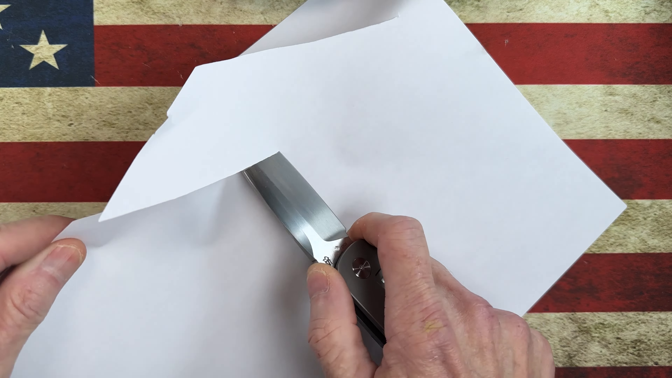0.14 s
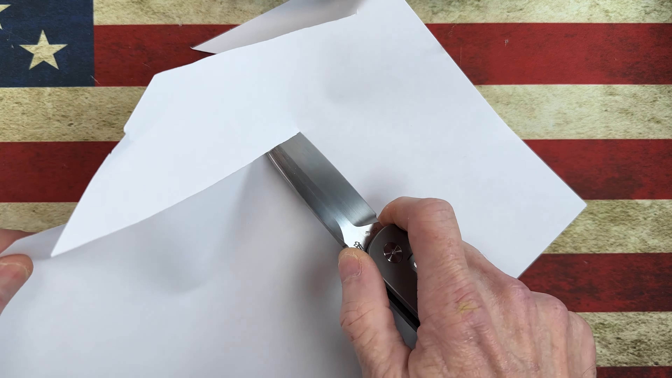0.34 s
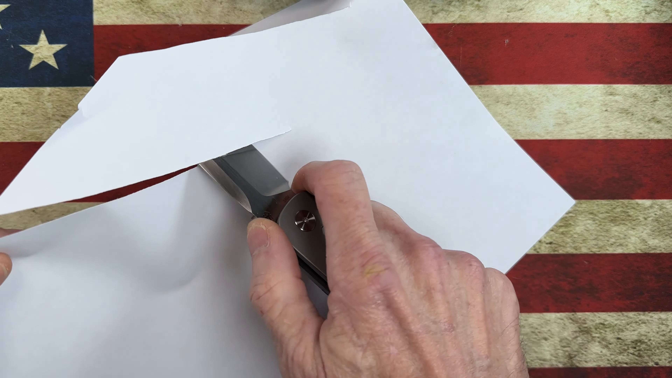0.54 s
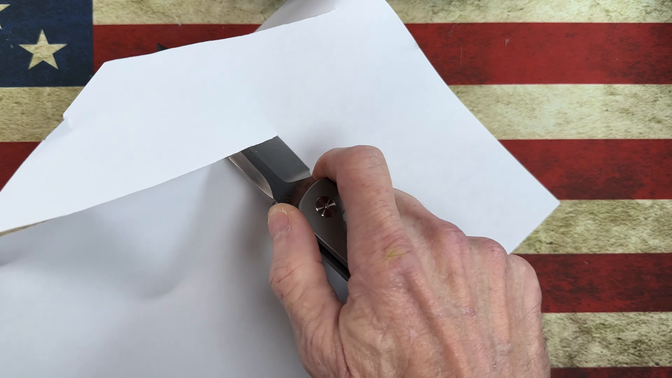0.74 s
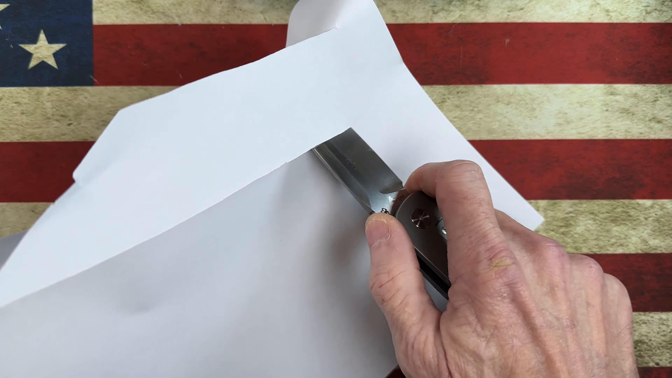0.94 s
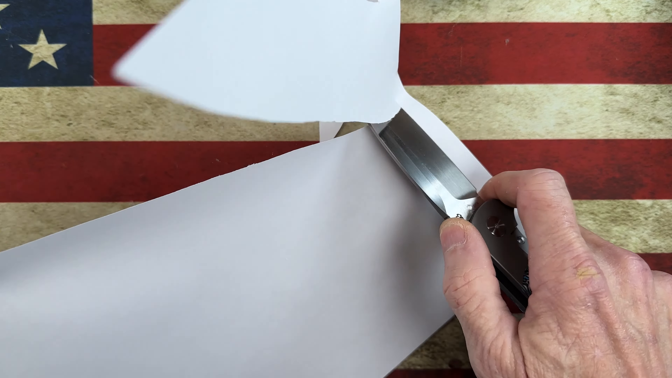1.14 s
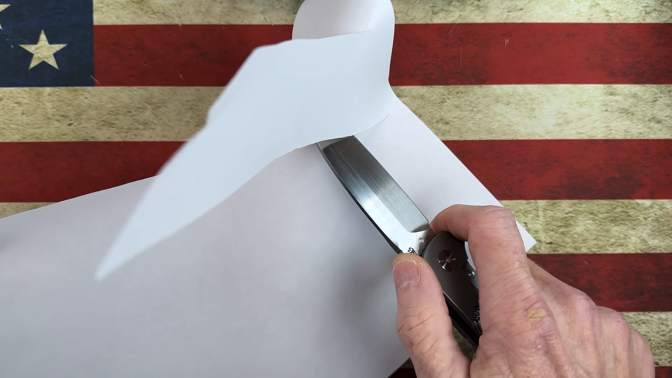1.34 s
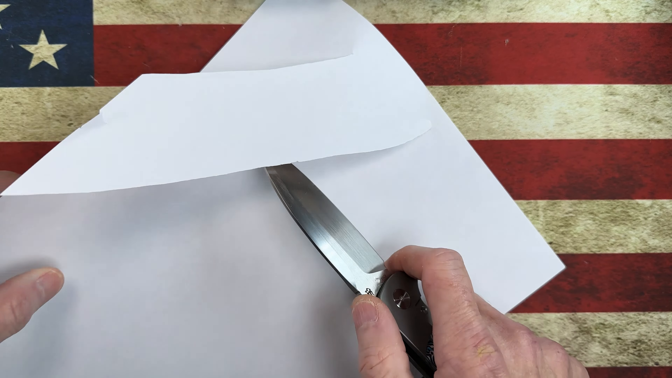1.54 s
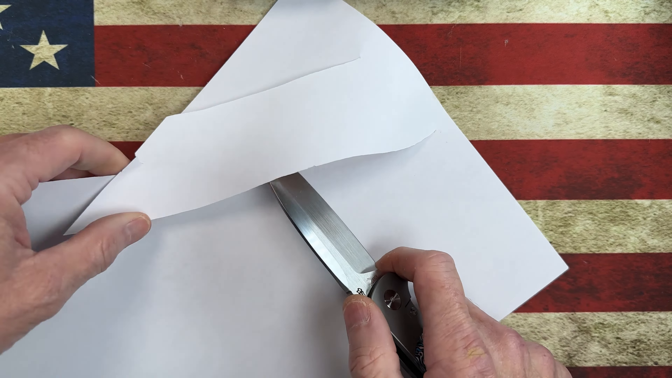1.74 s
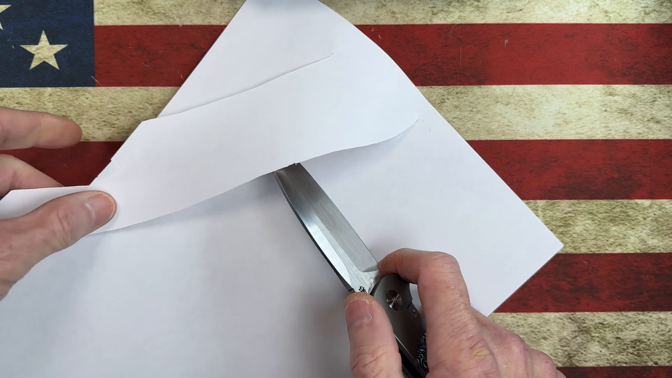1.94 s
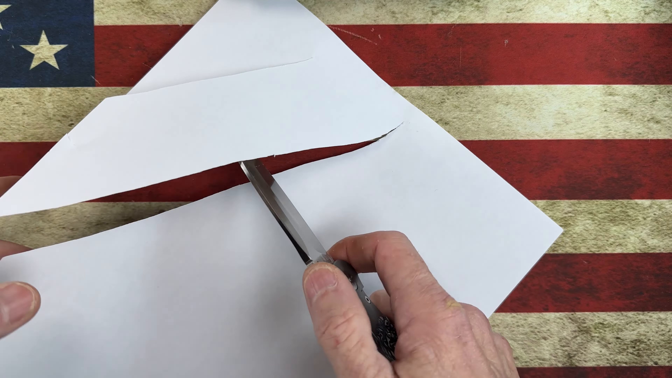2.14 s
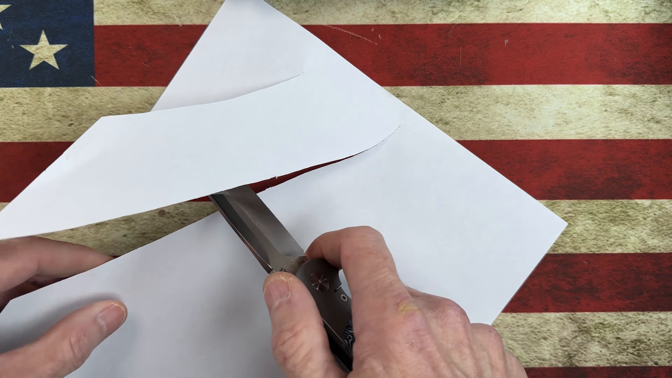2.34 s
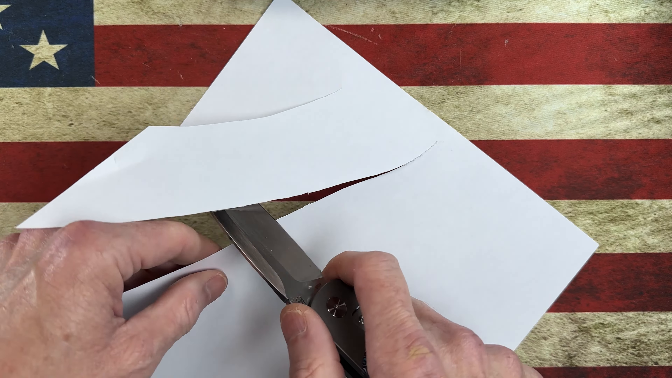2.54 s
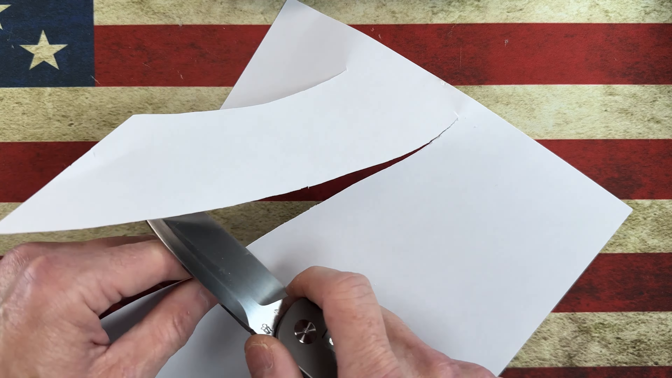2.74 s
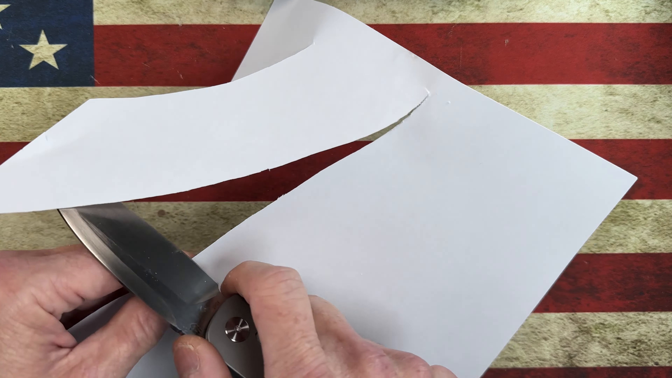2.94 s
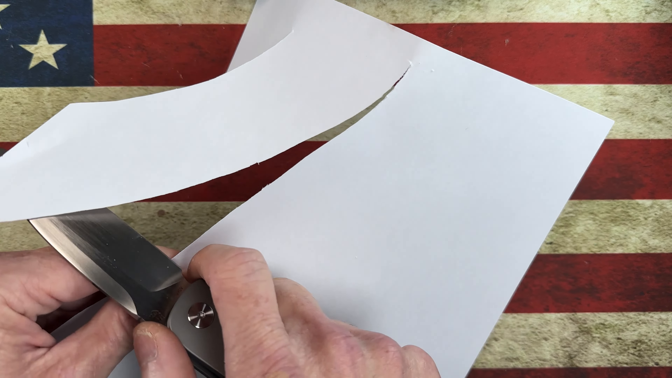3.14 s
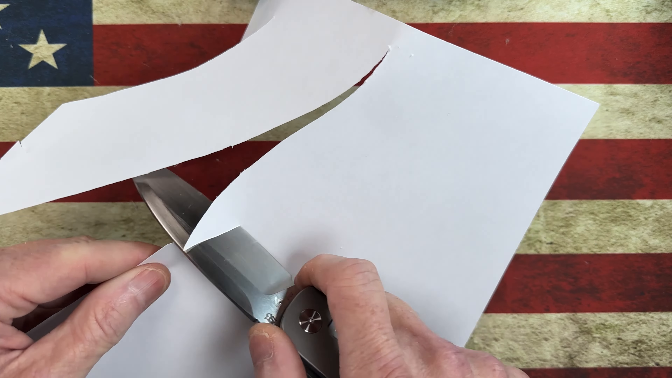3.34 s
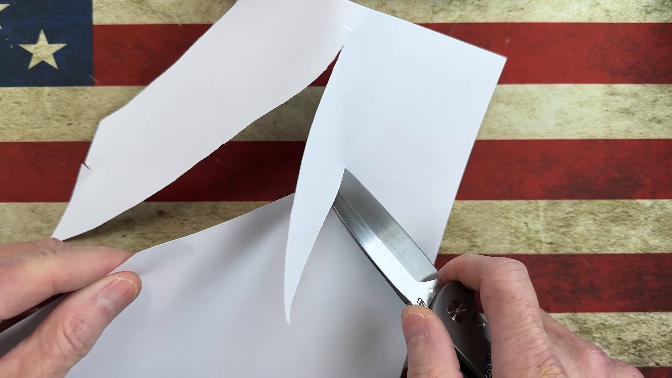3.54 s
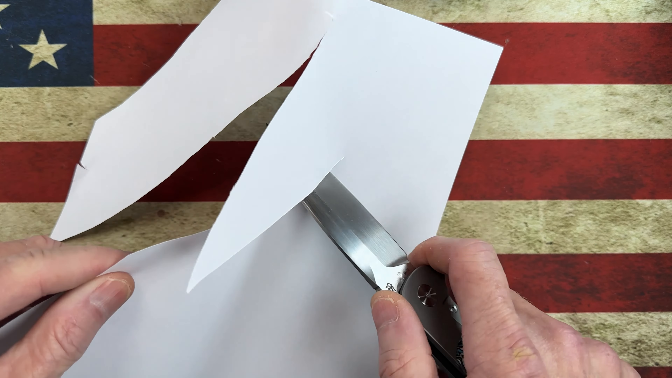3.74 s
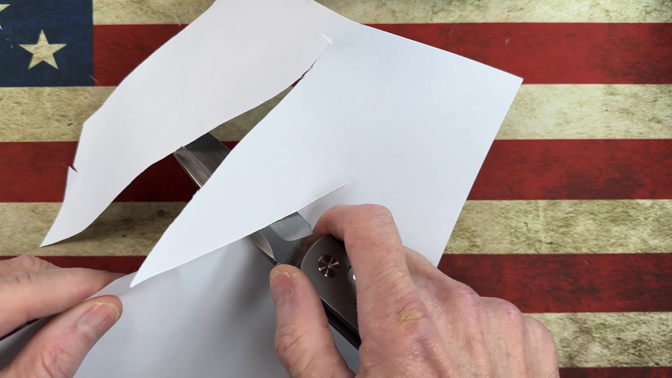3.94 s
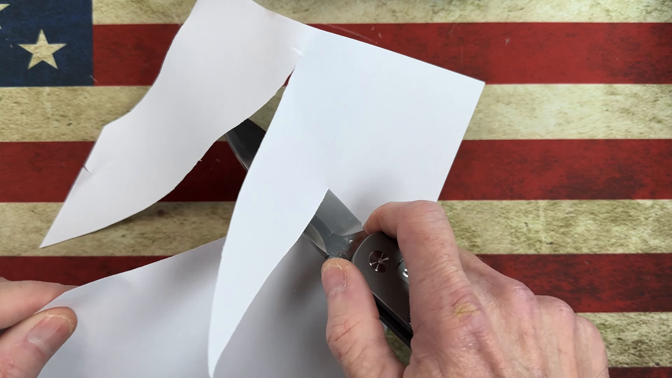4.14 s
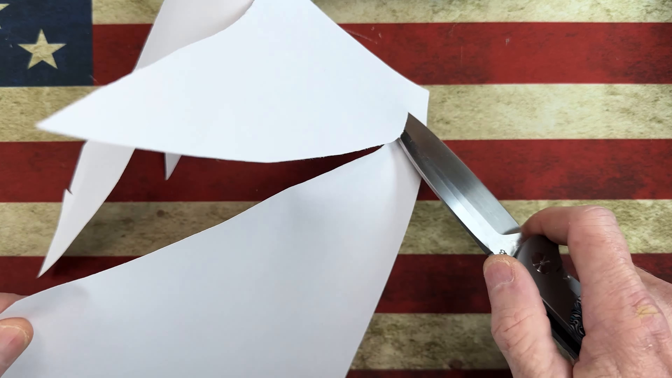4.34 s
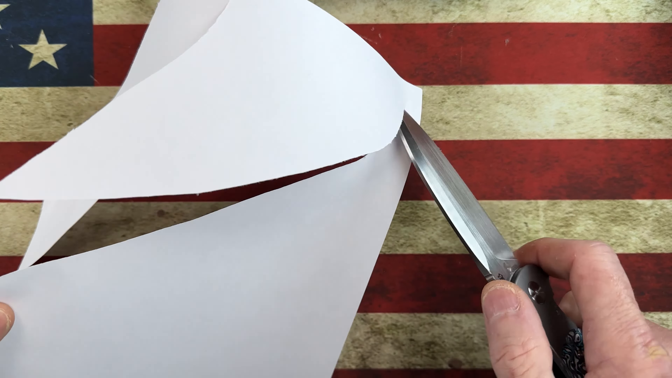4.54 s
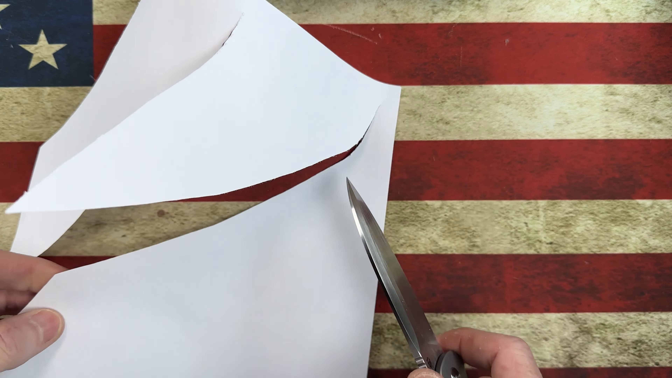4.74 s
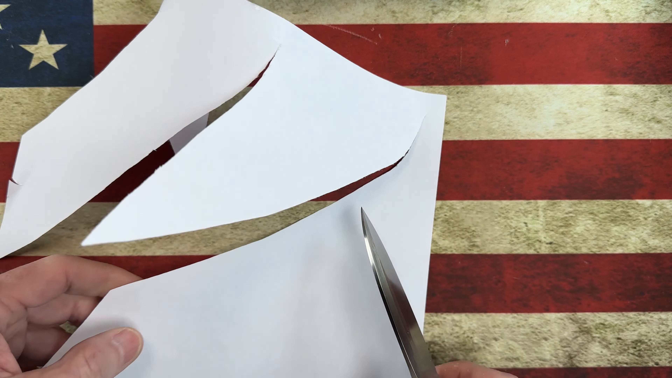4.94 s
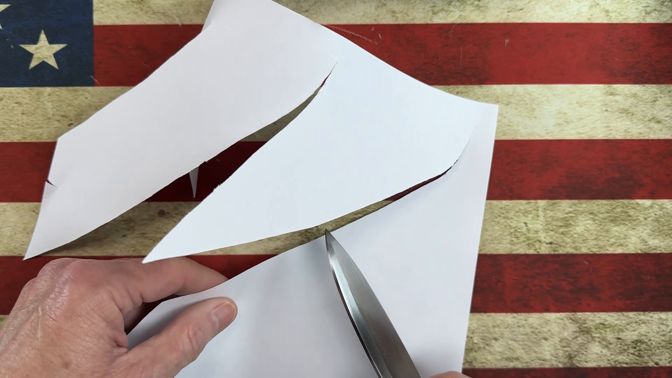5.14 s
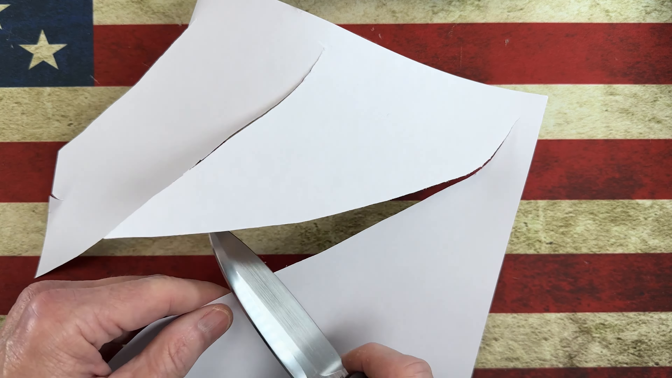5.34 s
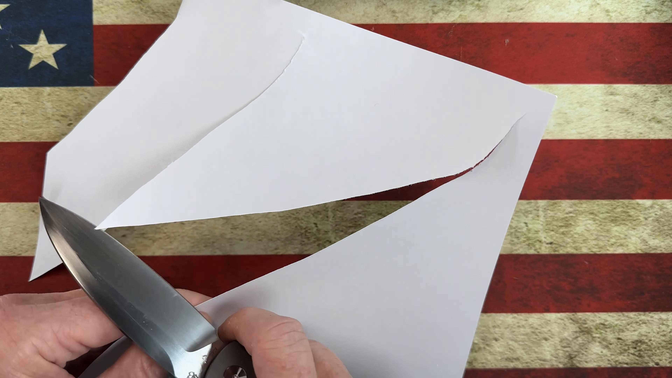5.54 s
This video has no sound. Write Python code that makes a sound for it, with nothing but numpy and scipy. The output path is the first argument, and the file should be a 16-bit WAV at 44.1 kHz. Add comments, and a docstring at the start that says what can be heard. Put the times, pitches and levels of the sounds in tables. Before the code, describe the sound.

Four brief tearing hisses of a knife through paper, each about a third of a second: two in the first second, two after three seconds. Between them the blade rubs back softly, loose strips rustle and tick, and the sheet pops once. Recorded close and dry in a small room, mono, with barely audible air and mains hum.

```python
"""A small room: over a table, a sharp knife slices a hand-held sheet of paper in four strokes, close to one microphone.
The edge snaps thousands of fibres a second; the sheet radiates them through resonances that fade, drift and pass.
Between strokes the blade slides back, loose strips rustle and tick, and the bending sheet pops once.
Noise bursts make the ticks, damped sines and a noise flutter the pop, wavering sines and noise the hum and air.
Dense, decaying noise serves as the reflections from table and walls."""
import sys
import numpy as np
from scipy import signal
from scipy.fft import rfft, irfft, next_fast_len
from scipy.io import wavfile
from scipy.ndimage import uniform_filter1d

SR = 44100
rng = np.random.default_rng(int(sys.argv[2]) if len(sys.argv) > 2 else 0)


def log_audio(samples):
    """Write samples as a 16-bit WAV file to the path given in sys.argv[1]."""
    # one column per channel
    frames = np.atleast_2d(samples).T
    # limit to full scale, then quantise
    limited = np.clip(frames, -1, 1)
    pcm = np.round(limited * 32767).astype(np.int16)
    wavfile.write(sys.argv[1], SR, pcm)


N = 246078
TIME = np.arange(N) / SR

# Body and fizz lie below and above these crossovers, with the middle band between them.
BODY_HZ, FIZZ_HZ = 1100, 4500
# Colour tables shape each band from within; the bands are then levelled separately.
# In cuts, slides and rustles, level_db is the middle band before the trim in scene(),
# and body and fizz are relative to the middle.

# Mains hum: pitch_hz, level_db (rms)
HUM_TONES = [(59.2, -71.5), (120, -70), (203, -70.5), (295, -78)]
# Colour of the still room air: pitch_hz, level_db (relative)
AIR_COLOUR = [(20, -0.5), (32, -26), (48, -6), (87, -2), (125, -12.5), (148, -9.5), (200, -8.5), (235, -11),
              (300, -12), (420, -16), (760, -19), (1100, -26.5), (5000, -40.5), (10000, -44.5),
              (16000, -56)]
AIR_DB = -64.5  # rms

# Knife strokes, from swell to crest to sag to release: start_s, length_s, attack_s, level_db (at the crest),
# swell_db, crest (share of length), sag_db, release_s (per 60 dB),
# first_body_db, last_body_db, first_fizz_db, last_fizz_db
CUT_STROKES = [(0.0, 0.28, 0.00067, -32, 3.5, 0.28, 6.5, 0.0643, -18, -4.5, -8, -5),
               (0.798, 0.27, 0.006, -41, 4.5, 0.53, 3.3, 0.25, -6.5, -8.5, -7, 0.5),
               (3.251, 0.37, 0.005, -36, 18.5, 0.71, 5, 0.11, -13, -7.5, 1, -5.5),
               (4.147, 0.24, 0.002, -40.5, 0, 0.56, 4, 0.23, -1, -3, -4.5, 2.5)]
SWELL_CURVE, SAG_CURVE = 1.9, 1.13  # powers of the distance before and after the crest
EASE_OFF_S = 0.004  # rounds the corner into the release
# Colour of the sheet in each stroke: pitch_hz, level_db (relative)
CUT_COLOUR_1 = [(150.0, -31), (300.0, -17), (450.0, -12), (700.0, -11), (950.0, -10), (1250.0, -12.5),
                (1800.0, -1.5), (2600.0, -9), (3600.0, -10.5), (5000.0, -11.5), (7000.0, -17.5),
                (9000.0, -20), (12000.0, -27.5), (15500.0, -41.5)]
CUT_COLOUR_2 = [(150.0, -24), (300.0, -10), (450.0, -11), (700.0, -3), (950.0, -6), (1250.0, -8),
                (1800.0, 1.5), (2600.0, -2), (3600.0, -3.5), (5000.0, -6.5), (7000.0, -8.5), (9000.0, -10),
                (12000.0, -21.5), (15500.0, -28)]
CUT_COLOUR_3 = [(150.0, -63), (300.0, -11.5), (450.0, -4.5), (700.0, 0.5), (950.0, 0), (1250.0, 2),
                (1800.0, 0.5), (2600.0, 1.5), (3600.0, -0.5), (5000.0, -6.5), (7000.0, -7.5),
                (9000.0, -15.5), (12000.0, -19.5), (15500.0, -32)]
CUT_COLOUR_4 = [(150.0, -21), (300.0, -12), (450.0, -4), (700.0, -1.5), (950.0, -1.5), (1250.0, -4),
                (1800.0, -2.5), (2600.0, -2), (3600.0, -2), (5000.0, -9), (7000.0, -11), (9000.0, -14),
                (12000.0, -20.5), (15500.0, -31)]

# Resonances (+) and nulls (-) of the sheet, deepest as each pass starts: pitch_hz, half_width_hz, level_db
SHEET_RESONANCES = [(895, 52, 5.5), (1050, 104, -3), (1740, 230, 1.5), (2950, 240, 1), (3760, 350, -4.5),
                    (4585, 73, 4), (6300, 250, -1.5), (7050, 190, 2.5)]
SLACKEN_S = 0.55  # time for their depth in dB to fall to 1/e
# The loose flap rings (+) or goes dull (-) for a moment as it bends:
# strongest_s, half_duration_s, pitch_hz, drift_hz_per_s, half_width_hz, level_db
FLAP_RINGS = [(0.1, 0.16, 7100, 1197.5, 260, 3), (0.195, 0.041, 4700, 500, 169.4, 4),
              (0.219, 0.033, 5160, -500, 129, 12.5), (0.15, 0.045, 9960, 0, 1500, -8),
              (0.842, 0.051, 4650, -2300, 220, 12), (2.19, 0.031, 2340, 5000, 318, 12.5),
              (2.47, 0.045, 7600, 0, 220, 11), (3.343, 0.1, 4180, -1000, 210, 12.5),
              (3.32, 0.076, 3000, 800, 170, 8.5), (3.396, 0.027, 750, 0, 400, -7.5),
              (3.465, 0.071, 1620, 500, 230, 8), (3.44, 0.046, 8460, 500, 190, 14),
              (3.543, 0.098, 7960, -200, 270, 7.5), (3.562, 0.049, 2220, -100, 130, 9),
              (4.28, 0.043, 2820, 0, 210, 8)]
# Weaker resonances of the flap come and go at random, drifting up or down by at most the given rate.
PASSING_PER_S, PASSING_DB, PASSING_HALF_S = 60, 7.5, 0.038
PASSING_HALF_WIDTH_HZ, MAX_DRIFT_HZ_PER_S = 110, 770
PASSING_LOW_HZ, PASSING_TOP_HZ = 1850, 13550

# Decay of the room: pitch_hz, t60_s
ROOM_DECAY = [(200, 0.26), (1000, 0.37), (3000, 0.47), (8000, 0.11), (15000, 0.12)]
# Reflections from table and walls are fullest near 1 kHz and duller in the treble: pitch_hz, level_db (relative)
REFLECTION_COLOUR = [(200, 1.5), (1000, 3), (1900, -0.5), (3500, -3.5), (6000, -2), (15000, -4)]

# Ticks and flicks of the paper: start_s, middle_db (before the trim in ticks()), body_db, fizz_db, t60_s
PAPER_TICKS = [(0.2296, -23.5, -55, -44, 0.045), (1.0809, -37, -42.5, -47, 0.029),
               (1.2888, -47, -73, -58, 0.055), (1.4386, -50, -74, -48.5, 0.08),
               (1.4601, -44.5, -61, -59, 0.085), (1.5005, -45, -73, -63, 0.035),
               (2.049, -78, -61.5, -65, 0.087), (2.2523, -61, -55, -59, 0.049),
               (2.6373, -50, -60, -50, 0.038), (4.0107, -55, -61, -62, 0.054),
               (4.149, -32, -34.5, -62, 0.022), (4.4652, -42, -57, -54, 0.038),
               (5.011, -56.5, -60, -56, 0.042), (5.0863, -57, -55, -54, 0.02),
               (5.426, -62, -65, -58, 0.089)]
# Colour of a tick: pitch_hz, level_db (relative)
PAPER_TICK_COLOUR = [(250, -42), (600, 0), (1000, -11.5), (1700, 17), (2400, 14), (3200, -6), (4000, 1),
                     (5500, -17), (9000, -20.5), (15000, -42)]

# Loose strips flex and brush each other: start_s, length_s, level_db (at the top of the arch), body_db, fizz_db
STRIP_RUSTLES = [(0.282, 0.11, -59.5, -3, 6), (0.42, 0.066, -57.5, -23, 0), (0.682, 0.1, -54.5, -11, -3.5),
                 (0.729, 0.15, -60.5, 7, -1.5), (1.069, 0.1, -52, 2, -19), (1.245, 0.063, -59, -6, -1),
                 (1.339, 0.047, -63, 0, -1), (1.415, 0.1, -53.5, -15, -10), (1.61, 0.092, -58, -12, -21),
                 (1.932, 0.068, -65, -24, 0), (2.0, 0.036, -60.5, -1, -3), (2.161, 0.072, -64.5, -8, -16),
                 (2.257, 0.093, -65, 6, -4), (2.386, 0.074, -64, -18, -6), (2.958, 0.036, -74, 0, 0),
                 (3.063, 0.075, -78, -2.5, 1), (3.213, 0.1, -72, 7.5, 5), (3.254, 0.069, -54, 5, 3),
                 (3.618, 0.11, -53.5, -16, -7.5), (4.593, 0.093, -60.5, -1, 1),
                 (4.7, 0.087, -64.5, -18, 0.5), (5.005, 0.14, -60.5, 7, -18), (5.126, 0.18, -62, -3.5, 1),
                 (5.225, 0.1, -70, 9, -4)]
RUSTLE_SKEW = 0.66  # below 1, a rustle rises faster than it fades

# The flat of the blade slides along the paper: start_s, length_s, first_level_db, last_level_db, body_db, fizz_db
BLADE_SLIDES = [(0.301, 0.353, -62, -67, -3.5, -0.5), (1.149, 0.1, -69, -75.5, -4, 1.5),
                (1.252, 0.28, -62.5, -65, -5, -4), (1.531, 0.513, -65.5, -66, -13, -2.5),
                (2.041, 0.67, -78, -64.5, -9.5, -1.5), (2.69, 0.4, -72.5, -86, -4, 0),
                (3.679, 0.6, -65, -66.5, -4, 1), (4.467, 0.377, -65.5, -73.5, -2, 0.5),
                (4.849, 0.25, -65, -71.5, -3, 4), (5.287, 0.1, -69, -73, 0, -0.5),
                (5.432, 0.18, -75, -79, 3.5, -2.5)]
SLIDE_RISE_S = 0.042
# Colour of light rubbing, for slides and rustles: pitch_hz, level_db (relative)
RUB_COLOUR = [(240, -10), (450, -6), (780, -5.5), (1150, -6.5), (1750, -2.5), (2900, -0.5), (3800, -1.5),
              (4800, -4), (6000, -9), (8000, -12), (10000, -18), (13000, -25.5), (16000, -34)]

# Heavily damped modes of the pop, as the held sheet bends: pitch_hz, level_db (before POP_DB and high-pass), t60_s
SHEET_POP_MODES = [(1100, -5, .007), (1550, 0, .006), (1950, -2, .006), (2950, -11, .005)]
# Colour of the sheet just after the pop: pitch_hz, level_db (relative)
FLUTTER_COLOUR = [(250, -24), (600, 2), (900, 2), (1600, -13), (2500, 2), (5000, -23), (15000, -43)]
POP_S, POP_DB = 2.6964, -31

EDGE_HZ = 15900  # upper limit of the recorder


def gain_of(db):
    """Decibels to amplitude."""
    return 10 ** (np.asarray(db) / 20)


def evened(x):
    """Scales to rms 1."""
    return x / np.sqrt(np.mean(x ** 2) + 1e-20)


def read(points, hz):
    """Reads a table on a log-frequency axis."""
    table_hz, value = np.transpose(points)
    return np.interp(np.log(hz + 1), np.log(table_hz + 1), value)


def add(mix, start, sound):
    """Mixes a sound in at its start in seconds, cut off at the end of the mix."""
    part = mix[max(round(start * SR), 0):][:len(sound)]
    part += sound[:len(part)]


def tint(x, colour):
    """Filters a sound by a colour table."""
    hz = np.fft.rfftfreq(len(x), 1 / SR)
    return irfft(rfft(x) * gain_of(read(colour, hz)), len(x))


def wander(size, rate_hz):
    """Slow random motion of rms 1, falling off smoothly around the given rate."""
    hz = np.fft.rfftfreq(size, 1 / SR)
    spectrum = rfft(rng.standard_normal(size)) * np.exp(-(hz / rate_hz) ** 2)
    return evened(irfft(spectrum, size))


def registers(x):
    """Splits a sound into body, middle and fizz, each of rms 1."""
    hz, spectrum = np.fft.rfftfreq(len(x), 1 / SR), rfft(x)
    below_body = 1 / (1 + (hz / BODY_HZ) ** 10)
    below_fizz = 1 / (1 + (hz / FIZZ_HZ) ** 10)
    shares = (below_body, below_fizz - below_body, 1 - below_fizz)
    return [evened(irfft(spectrum * share, len(x))) for share in shares]


def background(waver_rad=0.59):
    """Still room air as tinted noise, and mains hum as sines whose phases waver slightly."""
    size = next_fast_len(N, True)
    hum = np.zeros(N)
    for hz, db in HUM_TONES:
        phase = 2 * np.pi * (hz * TIME + rng.random()) + waver_rad * wander(size, 3.5)[:N]
        hum += gain_of(db) * np.sqrt(2) * np.sin(phase)
    air = gain_of(AIR_DB) * evened(tint(rng.standard_normal(size), AIR_COLOUR))[:N]
    return hum + air


def fibres(size, per_s, spread_db):
    """Tiny snaps of either sign at random moments, a few larger than the rest."""
    strength = gain_of(spread_db * np.minimum(rng.exponential(1, size), 4))
    sign = rng.choice([-1., 1.], size)
    happens = rng.random(size) < per_s / SR
    return evened(strength * sign * happens)


def catches(size, per_s, release_s=0.0081):
    """Now and then the contact snags and lets go: a sudden surge that dies away exponentially."""
    snags = np.minimum(rng.exponential(1, size), 2) * (rng.random(size) < per_s / SR)
    return signal.lfilter([1], [1, -np.exp(-1 / (release_s * SR))], snags)


def sheet(x, start, patchy_db=2.5):
    """The snaps leave the sheet through its fading modes, drifting rings and many weak, passing resonances."""
    hz, t, z = signal.stft(x, SR, nperseg=1024, noverlap=768)
    hz = hz[:, None]
    # smoothed chance makes the sheet patchy over pitch and time
    patches = uniform_filter1d(rng.standard_normal(z.shape), size=4, axis=0)
    patches = uniform_filter1d(patches, size=6, axis=1)
    field_db = patchy_db * evened(patches)
    for centre, width, db in SHEET_RESONANCES:
        field_db += db * np.exp(-t / SLACKEN_S - ((hz - centre) / width) ** 2)

    rings = [(s - start, *shape) for s, *shape in FLAP_RINGS if 0 < s - start < t[-1]]
    for when, place, drift in rng.random((64, 3))[:round(PASSING_PER_S * t[-1])]:
        centre = PASSING_LOW_HZ + place * (PASSING_TOP_HZ - PASSING_LOW_HZ)
        drift_hz_per_s = (2 * drift - 1) * MAX_DRIFT_HZ_PER_S
        rings.append((when * t[-1], PASSING_HALF_S, centre, drift_hz_per_s, PASSING_HALF_WIDTH_HZ, PASSING_DB))
    for s, span, centre, drift, width, db in rings:
        near = abs(t - s) < 2 * span
        since = t[near] - s
        off_centre = np.minimum(((hz - centre - drift * since) / width) ** 2, 20)
        field_db[:, near] += db * np.exp(-(since / span) ** 2 - off_centre)
    return signal.istft(z * gain_of(field_db), SR, nperseg=1024, noverlap=768)[1][:len(x)]


def rubbed_paper(start, force, body_db, fizz_db, colour, per_s, spread_db,
                 judder_db, judder_rate_hz, snags_per_s, snag_db):
    """One contact with paper: fibre snaps clumped by an uneven feed, radiated by the sheet, scaled by the force."""
    size = len(force)
    judder = judder_db * wander(size, judder_rate_hz)
    feed_db = judder + snag_db * np.minimum(catches(size, snags_per_s), 2)
    snaps = fibres(size, per_s, spread_db) * gain_of(feed_db)
    body, middle, fizz = registers(tint(sheet(snaps, start), colour))
    return force * (middle + gain_of(body_db) * body + gain_of(fizz_db) * fizz)


def cuts():
    """The edge parts fibres so fast that they merge into a hiss, which swells, sags and drops as the blade runs out."""
    out, t = np.zeros(N), TIME[:SR // 2]
    colours = (CUT_COLOUR_1, CUT_COLOUR_2, CUT_COLOUR_3, CUT_COLOUR_4)
    for stroke, colour in zip(CUT_STROKES, colours):
        start, length, attack_s, db, swell_db, crest, sag_db, release_s, *band_levels = stroke
        first_body, last_body, first_fizz, last_fizz = band_levels
        along = np.minimum(t / length, 1)
        before = np.maximum(1 - along / crest, 0)
        after = np.maximum((along - crest) / (1 - crest), 0)
        # a straight fall in dB after the stroke, with a rounded start
        let_go_db = 60 * EASE_OFF_S * np.logaddexp(0, (t - length) / EASE_OFF_S) / release_s
        force_db = db - swell_db * before ** SWELL_CURVE - sag_db * after ** SAG_CURVE - let_go_db
        force = np.minimum(t / attack_s, 1) * gain_of(force_db)
        body_db = first_body + (last_body - first_body) * along
        fizz_db = first_fizz + (last_fizz - first_fizz) * along
        add(out, start, rubbed_paper(start, force, body_db, fizz_db, colour, per_s=11000, spread_db=1.7,
                                     judder_db=0.0, judder_rate_hz=140, snags_per_s=83, snag_db=1.0))
    return out


def room(x, first_s=0.0021):
    """Dense reflections from table and walls: noise whose bands each die at their own speed."""
    hz, t, z = signal.stft(rng.standard_normal(SR // 2), SR, nperseg=256)
    decay = gain_of(-60 * t / read(ROOM_DECAY, hz)[:, None])
    tail = signal.istft(z * decay, SR, nperseg=256)[1]
    # silent up to first_s, then fading in over as long again
    tail = tail * np.clip(np.arange(len(tail)) / SR / first_s - 1, 0, 1)
    return signal.fftconvolve(x, tint(tail / np.linalg.norm(tail), REFLECTION_COLOUR))[:N]


def ticks(middle_trim_db=-5, rise_s=0.00055):
    """The paper buckles or flicks off the blade: a short, quickly damped burst of noise."""
    out, t = np.zeros(N), TIME[:8192]
    for start, middle_db, body_db, fizz_db, t60 in PAPER_TICKS:
        body, middle, fizz = registers(tint(rng.standard_normal(len(t)), PAPER_TICK_COLOUR))
        burst = gain_of(middle_db + middle_trim_db) * middle
        burst += gain_of(body_db) * body + gain_of(fizz_db) * fizz
        add(out, start, burst * gain_of(-60 * t / t60) * (1 - np.exp(-t / rise_s)))
    return out


def rustles():
    """A strip bends and brushes past in one short arch of crackle."""
    out, t = np.zeros(N), TIME[:2 ** 13]
    for start, length, db, body_db, fizz_db in STRIP_RUSTLES:
        along = np.minimum(t / length, 1)
        force = gain_of(db) * np.sin(np.pi * along ** RUSTLE_SKEW) ** 2
        add(out, start, rubbed_paper(start, force, body_db, fizz_db, RUB_COLOUR, per_s=7000, spread_db=0.7,
                                     judder_db=2.5, judder_rate_hz=120, snags_per_s=34, snag_db=4.0))
    return out


def slides(fall_s=0.037):
    """The flat of the blade rubs lightly, catching fewer fibres, less evenly, than a cut."""
    out, t = np.zeros(N), TIME[:2 ** 15]
    for start, length, first_db, last_db, body_db, fizz_db in BLADE_SLIDES:
        contact = np.minimum(t / SLIDE_RISE_S, 1) * np.clip(1 - (t - length) / fall_s, 0, 1)
        force = contact * gain_of(np.interp(t, [0, length], [first_db, last_db]))
        add(out, start, rubbed_paper(start, force, body_db, fizz_db, RUB_COLOUR, per_s=9000, spread_db=3.0,
                                     judder_db=1.5, judder_rate_hz=27, snags_per_s=76, snag_db=2.0))
    return out


def pop(flutter_db=-20, flutter_t60=0.07, radiate_hz=850, rise_s=0.0003):
    """A dull snap of a few cycles, too small a patch to radiate bass; the slack sheet flutters on briefly."""
    out, t = np.zeros(N), TIME[:8192]
    modes = [gain_of(db - 60 * t / t60) * np.sin(2 * np.pi * hz * t) for hz, db, t60 in SHEET_POP_MODES]
    snap = signal.lfilter(*signal.butter(2, radiate_hz, "highpass", fs=SR), sum(modes))
    flutter = evened(tint(rng.standard_normal(len(t)), FLUTTER_COLOUR))
    flutter = flutter * gain_of(flutter_db - 60 * t / flutter_t60)
    add(out, POP_S, gain_of(POP_DB) * (snap + flutter) * (1 - np.exp(-t / rise_s)))
    return out


def scene():
    """Paper close to one microphone, with its room reflections and background, the same in both channels."""
    paper = gain_of(-1.02) * cuts() + gain_of(-2.0) * slides() + gain_of(-2.75) * rustles() + ticks()
    close = paper + pop()
    mono = close + room(gain_of(-13.5) * close) + background()
    return np.array([mono, mono])


def record(dry):
    """The recorder's band limit: a steep low-pass."""
    low_pass = signal.firwin(511, EDGE_HZ, window=("kaiser", 9), fs=SR)
    return signal.oaconvolve(dry, low_pass[None], "same")


dry = scene()
out = record(dry)
log_audio(out)
```